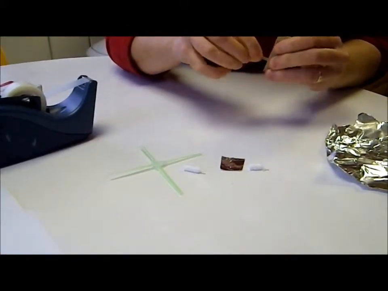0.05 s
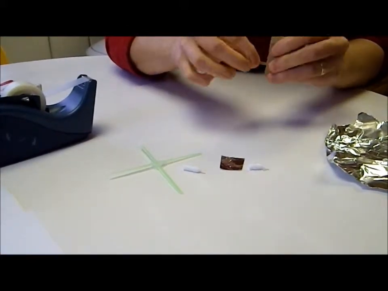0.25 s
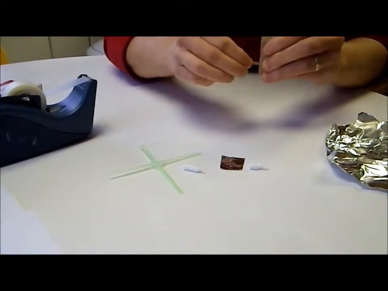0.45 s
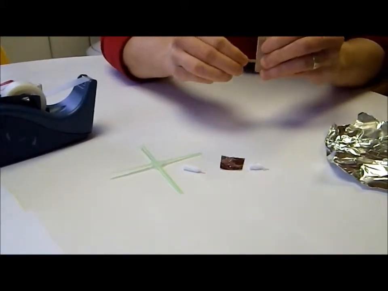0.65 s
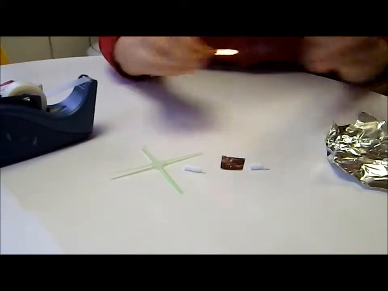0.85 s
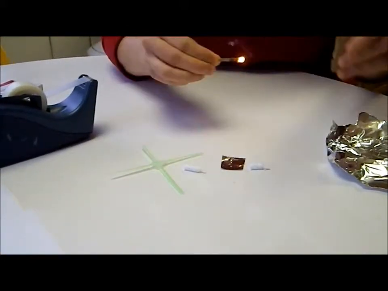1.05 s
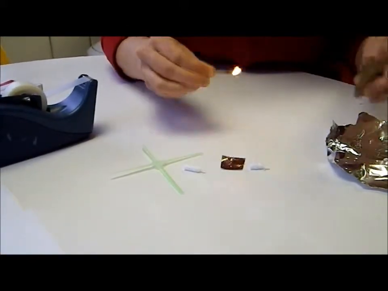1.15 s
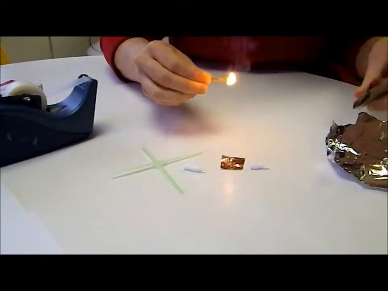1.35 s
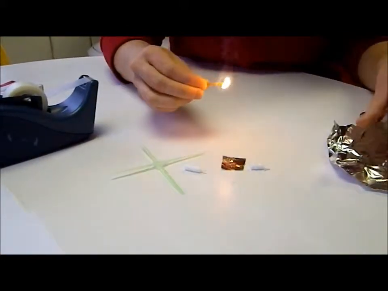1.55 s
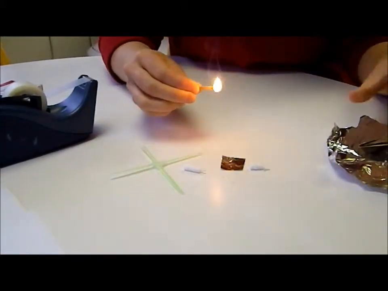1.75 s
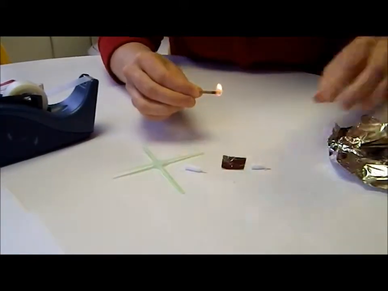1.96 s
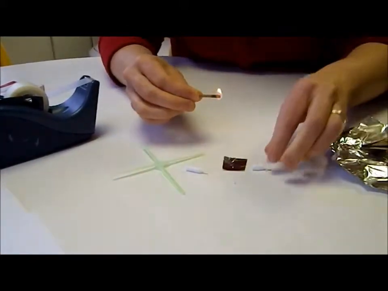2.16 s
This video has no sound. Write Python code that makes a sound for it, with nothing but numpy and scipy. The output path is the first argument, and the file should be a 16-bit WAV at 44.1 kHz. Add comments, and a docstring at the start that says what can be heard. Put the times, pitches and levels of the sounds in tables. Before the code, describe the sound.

A match strike, close in a quiet room with low rumble and faint hiss. Small finger ticks come in the first 0.25 seconds. At 0.8 a hard, bright, woody snap overloads the small microphone, echoes briefly off the walls, and the background ducks. From 1.0 a faint sputtering hiss grows, with sharp flares near 1.5 and the strongest at 1.62, ending about 1.8; then slowly recovering room hum.

```python
"""A match is struck close by in a quiet room: ticks, a catch and a loud snap, the walls' answer, a sputtering
hiss with five sudden flares, then only room hum. Blows ring the resonances of box and stick; ticks, crack,
flame and air are shaped noise; the walls are a decaying noise tail. The snap overloads a small camera, whose
gain control ducks hard and creeps back, taking the room hum with it."""
import sys
import numpy as np
from scipy import signal
from scipy.fft import rfft, irfft, next_fast_len
from scipy.io import wavfile
from scipy.ndimage import uniform_filter1d, map_coordinates

SR = 44100
rng = np.random.default_rng(int(sys.argv[2]) if len(sys.argv) > 2 else 0)


def unload_wav(signal):
    """Save mono or channel-first audio to the path in sys.argv[1] as 16-bit WAV at rate SR, clipped to [-1, 1]."""
    wavfile.write(
        sys.argv[1],
        SR,
        np.round(np.clip(np.atleast_2d(signal).T, -1, 1) * 32767).astype(np.int16),
    )


def to_linear_factor(level_db):
    """Convert decibel levels (scalar or array-like) to linear amplitude factors."""
    exponent = np.asarray(level_db, float) / 20
    return 10 ** exponent


N = 96534
T = np.arange(N) / SR
SNAP_S = 0.8093


def unit(x):
    """Scale to rms 1."""
    return x / np.sqrt(np.mean(x ** 2) + 1e-20)


def along(points, hz):
    """Interpolate (f/Hz, value) points on a log frequency axis."""
    f, v = np.transpose(points)
    return np.interp(np.log(hz + 1), np.log(f + 1), v)


def filtered(x, response):
    """Multiply the spectrum of x by a complex response of frequency."""
    m = next_fast_len(N + SR)
    return irfft(rfft(x, m) * response(np.fft.rfftfreq(m, 1 / SR)), m)[:N]


def noise(gain):
    """Fresh noise of rms 1, shaped by a gain of frequency."""
    return unit(filtered(rng.standard_normal(N), gain))


def peak(f, hz, width_hz):
    """One causal resonance with gain 1 at its centre."""
    return 1j * f * width_hz / (hz * hz - f * f + 1j * f * width_hz)


def low_pass(f, edge_hz, order):
    """Steep zero-phase low-pass, half amplitude at the edge."""
    return 1 / (1 + (f / edge_hz) ** order)


def burst(start_s, rise_s, t60_s):
    """Envelope: exponential rise, then exponential fall."""
    t = np.maximum(T - start_s, 0)
    return (1 - np.exp(-t / rise_s)) * to_linear_factor(np.maximum(-60 * t / t60_s, -200))


def box(f):
    """Response of box and stick: parallel resonances of alternating sign."""
    # modes: f/Hz, width/Hz, level/dB
    modes = [(260, 580, -11), (1097, 1190, -4.5), (2000, 1200, 0), (3258, 1200, 1), (4820, 1000, 4.5),
             (8560, 1300, -11.5), (10100, 900, -16), (11900, 1100, -16), (15360, 1000, -13)]
    total = 0
    for k, (hz, width_hz, db) in enumerate(modes):
        total = total + (-1) ** k * to_linear_factor(db) * peak(f, hz, width_hz)
    # coupled pair of resonances: builds up after the blow
    pair = to_linear_factor(8) * peak(f, 6551, 790) ** 2
    return total - pair


def strike():
    """Low-passed impulses ring the box; a scrape precedes the snap, splintering noise goes with it."""
    # the head catches, lets go, and the table throws the snap back: t/s, level/dB, low-pass f/Hz
    blows = [(0.8027, 15.5, 503), (0.8094, 33.5, 14000), (.8107, 19, 4000), (.8161, 17, 9000)]
    # scrape between catch and snap: start/s, end/s, level/dB
    scrape_start_s, scrape_end_s, scrape_db = (.8025, .809, -25)

    def struck_box(f):
        hits = 0
        for s, db, dull_hz in blows:
            delay = np.exp(-2j * np.pi * f * s)
            hits = hits - to_linear_factor(db) * delay / (1 + 1j * f / dull_hz)
        return hits * box(f)

    impulse = np.zeros(N)
    impulse[0] = 1
    ringing = filtered(impulse, struck_box)
    scraping = (T > scrape_start_s) & (T < scrape_end_s)
    scrape = to_linear_factor(scrape_db) * noise(box) * scraping
    crack = to_linear_factor(-19) * burst(SNAP_S, rise_s=0.00011, t60_s=0.013) * rng.standard_normal(N)
    return ringing + scrape + crack


def flame_hiss():
    """Burning head: coloured noise on a level curve with random sputter in dB."""
    # hiss of the burning head: t/s, level/dB
    burn = [(1.0, -37), (1.07, -52), (1.09, -40.5), (1.104, -39), (1.12, -79), (1.14, -52), (1.16, -39),
            (1.21, -42), (1.235, -35), (1.30, -36), (1.33, -40.5), (1.36, -34), (1.43, -40.5),
            (1.46, -35.5), (1.494, -30), (1.515, -34.5), (1.56, -35), (1.61, -30.5), (1.7, -36),
            (1.785, -40), (1.795, -81)]
    # hiss colour: f/Hz, relative level/dB
    fizz = [(250, -28), (550, -3), (1200, -7.5), (1900, -8), (3100, -14), (4500, -7), (6500, -2),
            (7200, -5.5), (7700, -21), (8250, -14.5), (8900, -25), (12100, -12.5), (13300, -21),
            (15500, -36.5)]
    sputter_db, sputter_per_s = 2, 170
    wobble_db = sputter_db * map_coordinates(rng.standard_normal(N // 100), [T * sputter_per_s])
    s, db = np.transpose(burn)
    level_db = np.interp(T, s, db, -120, -120) + wobble_db
    return to_linear_factor(level_db) * noise(lambda f: to_linear_factor(along(fizz, f)))


def flares():
    """Sudden flares: coloured noise bursts, each with its own spectral tilt."""
    # flares: t/s, level/dB, rise/s, t60/s, tilt/(dB per octave)
    events = [(1.497, -23, 0.00084, 0.021, -3), (1.5271, -19, 0.00039, 0.037, -3),
              (1.533, -23, .001, 0.13, -2), (1.6232, -14.5, 0.002, 0.18, 3), (1.785, -37, .001, .03, -4)]
    # flare colour before tilt: f/Hz, relative level/dB
    colour = [(290, -50), (500, -20), (1450, -4.5), (1800, -15), (2430, -3), (3150, -6), (4700, -0.5),
              (7450, -3), (12100, -8.5), (15500, -20)]
    total = np.zeros(N)
    for s, db, rise_s, t60_s, tilt_db in events:
        puff = noise(lambda f: to_linear_factor(along(colour, f) + tilt_db * np.log2((f + 200) / 6000)))
        total += to_linear_factor(db) * burst(s, rise_s, t60_s) * puff
    return total


def ticks():
    """Fingers and sparks: short puffs of band noise."""
    # ticks: t/s, level/dB, f/Hz, t60/s
    events = [(.0115, -23, 4780, .008), (.047, -39, 4600, .015), (.186, -45.5, 6370, .03),
              (.2395, -32.5, 4600, .008), (1.0405, -26, 11560, .008), (1.049, -37, 4200, .012)]
    total = np.zeros(N)
    for s, db, hz, t60_s in events:
        band = noise(lambda f: peak(f, hz, 0.44 * hz) ** 2)
        total += to_linear_factor(db) * burst(s, 0.00042, t60_s) * band
    return total


def walls(x, colour):
    """Room answer: convolution with delayed noise, each frequency decaying at its own rate."""
    # wall decay: f/Hz, t60/s
    decay = [(300, 0.2), (900, 0.18), (2000, 0.3), (4000, .33), (6500, .27), (10000, 0.16), (15000, 0.22)]
    delay_s, rise_s = 0.0049, 0.00073
    hz, t, z = signal.stft(rng.standard_normal(SR // 2), SR, nperseg=256)
    gain_db = along(colour, hz)[:, None] - 60 * t / along(decay, hz)[:, None]
    tail = signal.istft(z * to_linear_factor(gain_db), SR, nperseg=256)[1]
    tail = tail * (1 - np.exp(-np.arange(len(tail)) / SR / rise_s))
    tail = tail / np.linalg.norm(tail)
    tail = np.pad(tail, (round(delay_s * SR), 0))
    return signal.fftconvolve(x, tail)[:N]


def air():
    """Steady room rumble and hiss, plus narrow noise bands: a wavering hum and a faint whine."""
    # rumble and hiss colour: f/Hz, relative level/dB
    colour = [(13, -40.5), (22, -2), (47, -8.5), (142, -7.5), (239, -2), (352, -8), (392, -11.5),
              (475, -12.5), (698, -14), (893, -20), (1020, -17), (1590, -23), (3720, -28), (5170, -25),
              (8020, -31), (14300, -36), (15500, -38.5)]
    hiss = to_linear_factor(-41) * noise(lambda f: to_linear_factor(along(colour, f)))
    hum = to_linear_factor(-54) * noise(lambda f: peak(f, 234, 14))
    whine = to_linear_factor(-66.5) * noise(lambda f: peak(f, 5152, 180) ** 2)
    return hiss + hum + whine


def scene():
    """Match, room and air; the ticks are too faint to wake the room."""
    # the snap as the walls return it: f/Hz, relative level/dB
    snap_colour = [(100, -25), (300, -12), (600, -13.5), (1000, -7.5), (1900, -5.5), (3000, -6.5),
                   (4800, -4.5), (6800, -2), (7800, -10.5), (9000, -15), (12500, -20), (15500, -26.5)]
    fire = flame_hiss() + flares()
    snap = to_linear_factor(31) * (np.arange(N) == round(SNAP_S * SR))
    room = walls(snap, snap_colour) + to_linear_factor(-10) * walls(fire, [(1000, 0)])  # flat colour for the flame
    return (strike() + fire + ticks() + room + air())[None]


def band_limit(x):
    """A steep low-pass at the top of the band."""
    return signal.sosfilt(signal.butter(12, 21830, fs=SR, output="sos"), x)


def record(dry):
    """The input clips; gain control ducks by the excess over its knee and recovers slowly."""
    ceiling, hardness = 0.91, 24
    knee_db, recover_db_per_s = -13, 9
    sense_s, duck_s = 0.0017, 0.0056  # level window and lag; duck time constant
    heard = filtered(dry[0], lambda f: low_pass(f, 15800, 120))
    clipped = heard / (1 + np.abs(heard / ceiling) ** hardness) ** (1 / hardness)

    # level is sensed ahead of the clipping
    lag = round(sense_s * SR)
    power = np.abs(uniform_filter1d(heard ** 2, lag))
    over_db = np.maximum(10 * np.log10(power + 1e-12) - knee_db, 0)
    # peak hold, falling at a constant dB rate
    recovery_db = recover_db_per_s * T
    held_db = np.maximum(np.maximum.accumulate(over_db + recovery_db) - recovery_db, 0)
    keep = np.exp(-1 / (duck_s * SR))
    smooth_db = signal.lfilter([1 - keep], [1, -keep], held_db)
    duck_db = np.pad(smooth_db, (lag, 0))[:N]

    mix = filtered(clipped * to_linear_factor(-duck_db), lambda f: low_pass(f, 17200, 120))
    return band_limit(mix[None])


dry = scene()
out = record(dry)
unload_wav(out)
```